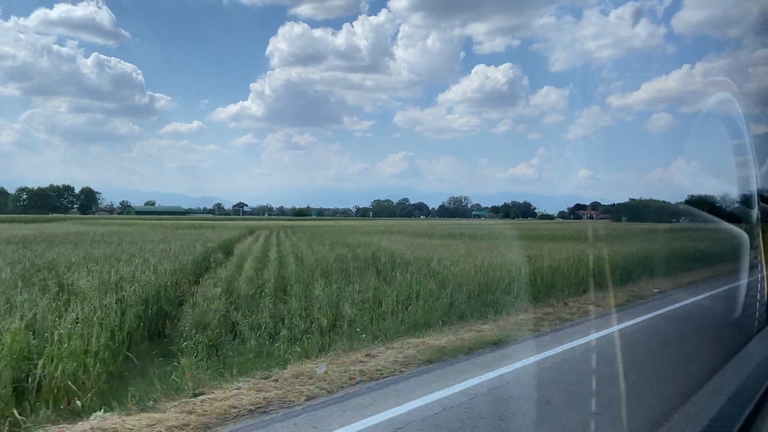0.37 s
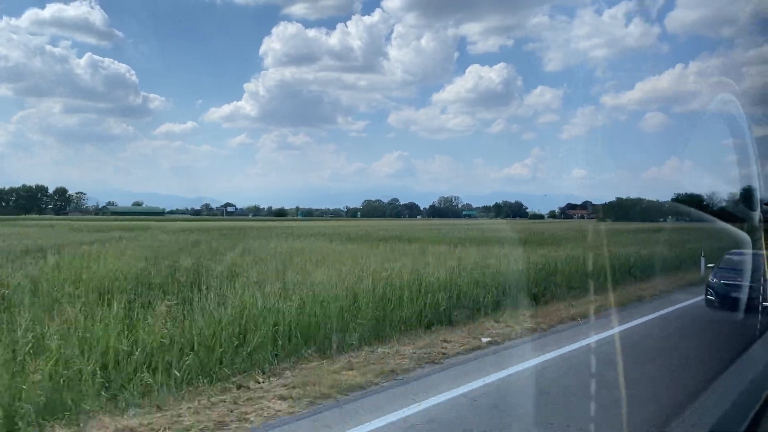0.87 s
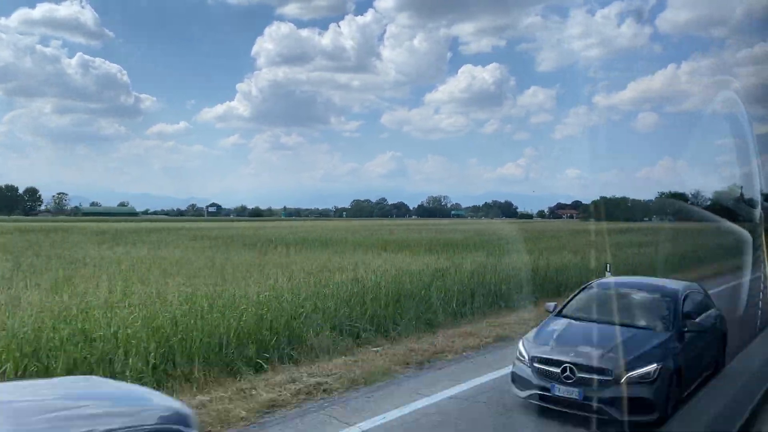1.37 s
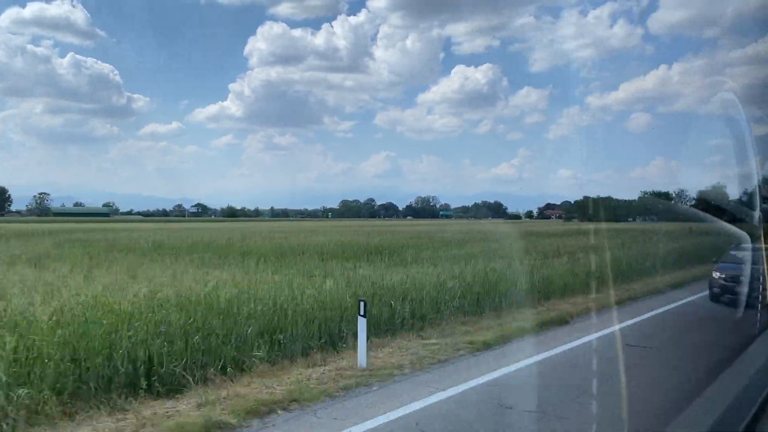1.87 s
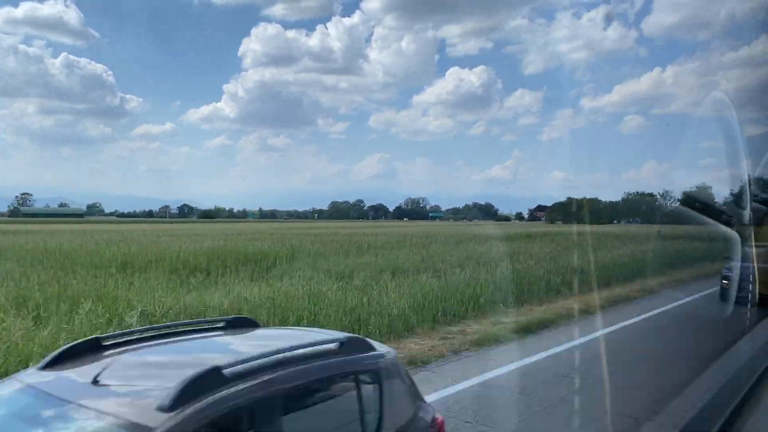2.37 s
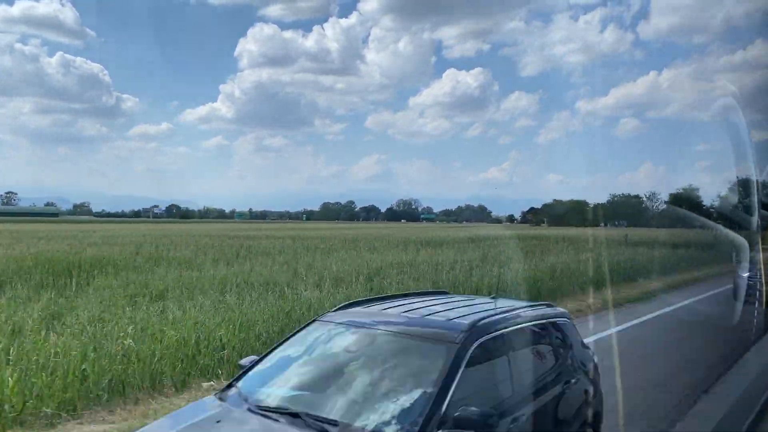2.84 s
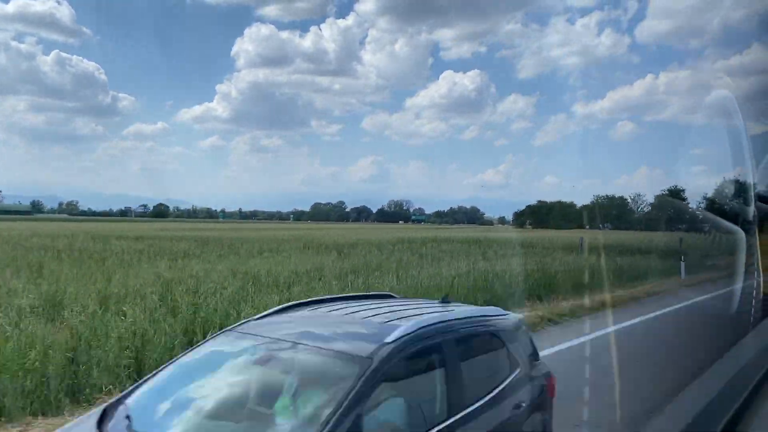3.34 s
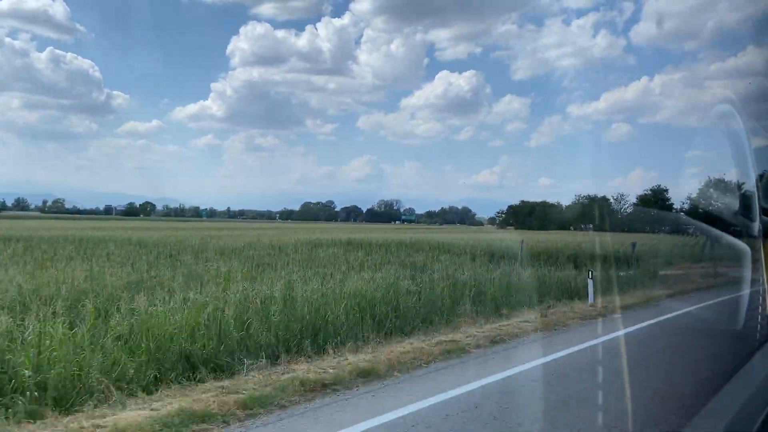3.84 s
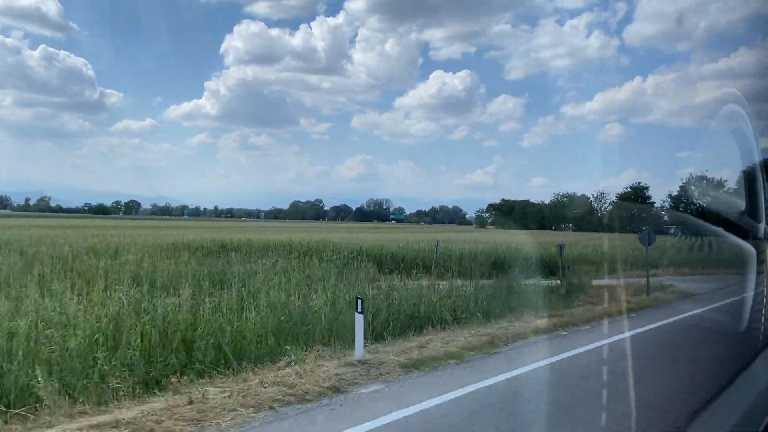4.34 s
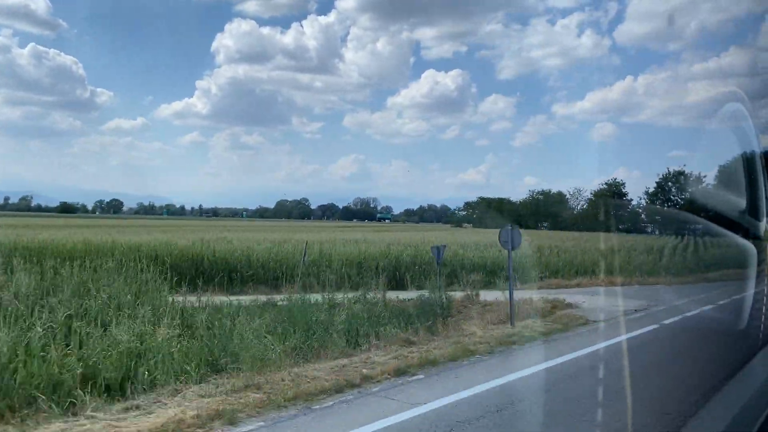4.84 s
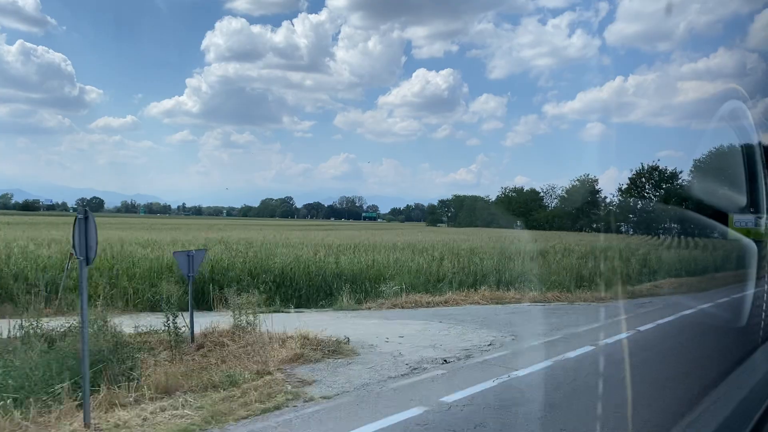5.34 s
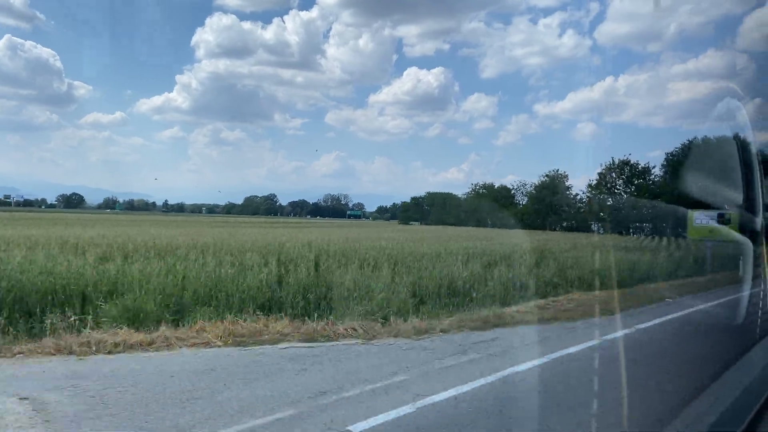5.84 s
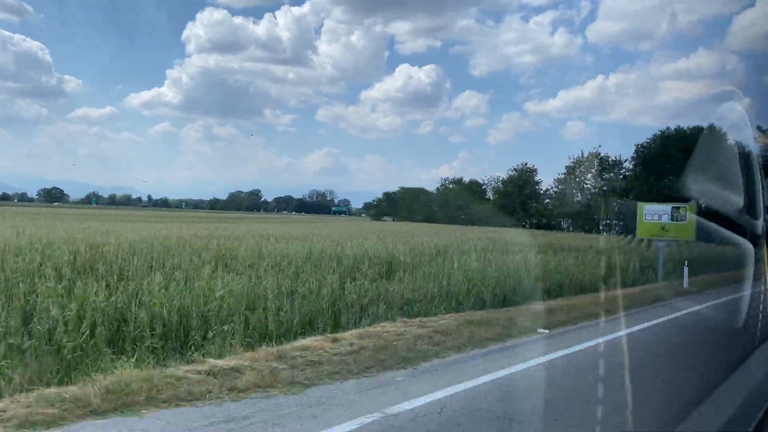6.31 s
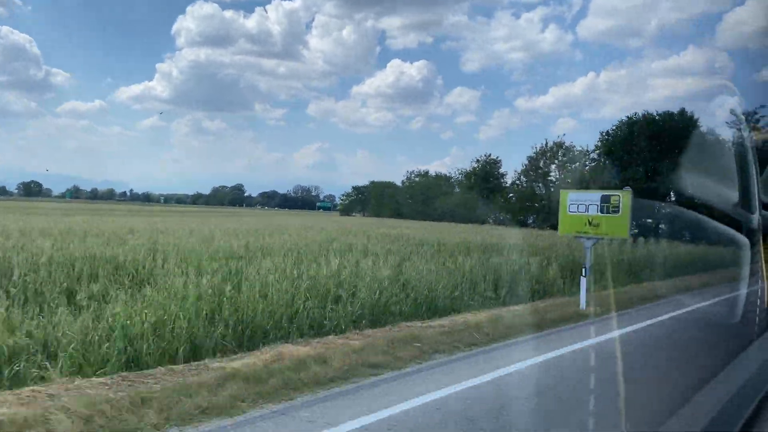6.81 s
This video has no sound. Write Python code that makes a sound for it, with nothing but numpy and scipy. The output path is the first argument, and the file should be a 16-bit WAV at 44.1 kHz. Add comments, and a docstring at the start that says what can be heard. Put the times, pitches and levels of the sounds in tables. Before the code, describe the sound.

Inside a moving coach, a deep steady drone of road boom and engine hum, with loose trim buzzing and rattling in quick bursts and sharp ticks.

```python
"""Inside a coach at steady road speed, a phone held at the window, in stereo.
Throughout: filtered noise for road boom, tyres and air, sine orders for an engine that sinks slowly.
From the start a faint narrow-band whine weakens to about 4 s, then partly returns, unevenly.
Loose trim rattles in swarms of contacts about 12 times a second: briefly at first, at 0.8-4 s in one
long run, from 4.5 s in shorter runs. Harder ticks, short noise rings, crowd at 1.9-2.9 s and after 5.6 s."""
import sys
import numpy as np
from scipy import signal
from scipy.fft import rfft, irfft, next_fast_len
from scipy.io import wavfile
from scipy.ndimage import uniform_filter1d, minimum_filter1d, map_coordinates

SR = 44100
rng = np.random.default_rng(int(sys.argv[2]) if len(sys.argv) > 2 else 0)


def store_pcm(level_fs):
    """Save levels as 16-bit WAV."""
    pcm = np.round(np.clip(level_fs, -1, 1) * 32767).astype(np.int16)
    wavfile.write(sys.argv[1], SR, np.atleast_2d(pcm).T)


def convert_level_to_amplitude(level_db):
    """Map a level in decibels to its linear amplitude factor."""
    exponent = np.asarray(level_db, float) / 20
    return 10 ** exponent


N = 317079


def unit(x):
    """Scale to rms 1."""
    return x / np.sqrt(np.mean(x ** 2) + 1e-20)


def along(points, freq_hz):
    """Read (freq_hz, value) points on a log frequency axis."""
    point_hz, value = np.transpose(points)
    return np.interp(np.log(freq_hz + 1), np.log(point_hz + 1), value)


def curves(rows):
    """One value per sample for each column after the time."""
    time_s, *columns = np.transpose(rows)
    return [np.interp(np.arange(N) / SR, time_s, column) for column in columns]


def wobble(knots_per_s):
    """Smooth random curve: a spline through random knots."""
    knots = rng.standard_normal(int(N * knots_per_s / SR) + 4)
    return map_coordinates(knots, [np.arange(N) * knots_per_s / SR])


def filtered(x, response):
    """Multiply the spectrum of x by a complex response of frequency."""
    size = next_fast_len(N + SR // 2)
    spectrum = rfft(x, size) * response(np.fft.rfftfreq(size, 1 / SR))
    return irfft(spectrum, size)[..., :N]


def resonances(modes):
    """Causal response of (centre_hz, width_hz, level_db) modes in parallel, signs alternating."""
    def response(hz):
        total = 0
        for k, (centre_hz, width_hz, level_db) in enumerate(modes):
            damping = 1j * hz * width_hz
            total = total + (-1) ** k * convert_level_to_amplitude(level_db) * damping / (centre_hz ** 2 - hz ** 2 + damping)
        return total
    return response


def noise(spectrum, patchy_db):
    """Two unrelated noises of rms 1, sharing time-frequency patches of random gain."""
    z = signal.stft(rng.standard_normal((2, N)), nperseg=512)[2]
    field = uniform_filter1d(rng.standard_normal(z.shape[1:]), size=5, axis=0)
    field = uniform_filter1d(field, size=12, axis=1)
    pair = signal.istft(z * convert_level_to_amplitude(patchy_db * unit(field)), nperseg=512)[1][:, :N]
    return unit(filtered(pair, lambda hz: convert_level_to_amplitude(along(spectrum, hz))))


def tone(freq_hz, level_db, wander_hz, waver_db):
    """Sine with wandering pitch and level, at unrelated phases on two paths."""
    phase = 2 * np.pi * np.cumsum(freq_hz + wander_hz * wobble(6)) / SR
    level = np.sqrt(2) * convert_level_to_amplitude(level_db + waver_db * wobble(4.6))
    return level * np.sin(phase + 2 * np.pi * rng.random((2, 1)))


# body boom under and over 65 Hz: time_s, shake_db, boom_db
ROAD_LEVELS = [(0, -11.5, -17), (.66, -27.5, -14.5), (1.04, -19.5, -20), (2.16, -20.5, -15),
               (2.64, -19.5, -17), (3.2, -20, -18), (3.5, -18.5, -20), (3.68, -22.5, -23.5),
               (4.25, -19, -17), (4.95, -17.5, -16.5), (5.23, -20, -18.5), (5.49, -23, -15),
               (5.85, -16.5, -17), (6.0, -19, -20.5), (6.7, -20.5, -16), (6.83, -19, -24.5),
               (7.19, -20, -15.5)]
# relative noise spectra, lowest to highest: freq_hz, density_db
SHAKE_SPECTRUM = [(8, -52), (15, -42.5), (25, -21), (33, -7), (42, -3.5), (50, -2), (58, -3), (65, -3),
                  (84, -23), (140, -120)]
BOOM_SPECTRUM = [(38, -24.5), (65, -2), (75, -1), (95, 2), (102, -2.5), (112, -7.5), (130, -7), (150, -17),
                 (200, -61.5), (330, -120)]
DRUM_SPECTRUM = [(88, -36.5), (150, -5), (201, -1), (350, -17), (460, -35.5), (770, -120)]
# body resonances, applied twice: centre_hz, width_hz, level_db
BODY_MODES = [(70.87, 8.3, 0), (92.05, 8.9, -3)]
# lowest cabin hum: freq_hz, level_db (re shake), wander_hz
CABIN_HUM = (50.5, -3, 1.88)


def road():
    """Road unevenness drives low body modes and floor panels; the cabin hum follows the shaking."""
    shake_db, boom_db = curves(ROAD_LEVELS)
    drum_start_db, drum_fall_db_per_s, drum_swell_db, drum_db_per_boom_db = -27.5, 0.11, 0.82, 0.3
    drum_db = drum_start_db - drum_fall_db_per_s * np.arange(N) / SR
    drum_db = drum_db + drum_swell_db * wobble(9.0)
    drum_db = drum_db + drum_db_per_boom_db * (boom_db - boom_db.mean())
    # squared response: steep skirts
    body = filtered(rng.standard_normal((2, N)), lambda hz: resonances(BODY_MODES)(hz) ** 2)
    hum_hz, hum_db, wander_hz = CABIN_HUM
    shake = convert_level_to_amplitude(shake_db) * noise(SHAKE_SPECTRUM, patchy_db=1.7)
    boom = convert_level_to_amplitude(-1.5) * noise(BOOM_SPECTRUM, patchy_db=-0.2) + convert_level_to_amplitude(-6) * unit(body)
    drum = convert_level_to_amplitude(drum_db) * noise(DRUM_SPECTRUM, patchy_db=-0.03)
    hum = tone(hum_hz, shake_db + hum_db, wander_hz, waver_db=-1.0)
    return shake + convert_level_to_amplitude(boom_db) * boom + drum + hum


# tyre roar: time_s, roar_db
ROAR_LEVELS = [(0, -32), (.5, -32.5), (.75, -33.5), (.94, -36), (1.5, -35), (2.2, -34), (2.6, -35),
               (3.14, -36), (3.72, -36.5), (4.4, -36), (5.1, -36), (5.5, -35), (5.79, -34), (6.2, -34),
               (6.7, -33.5), (6.95, -34), (7.19, -35)]
# relative noise spectra of tyre roar, tread, air: freq_hz, density_db
ROAR_SPECTRUM = [(210, -36), (350, -1), (378, -6.5), (410, -3.5), (556, -3), (605, -5), (800, -10.5),
                 (1040, -28), (1760, -120)]
TREAD_SPECTRUM = [(470, -38.5), (800, -2.5), (1100, -4.5), (1230, -7.5), (1350, -10.5), (1430, -11),
                  (1540, -13.5), (2000, -17.5), (2600, -46), (4400, -120)]
HISS_SPECTRUM = [(1180, -22), (2000, -5), (2900, -8.5), (4850, -14), (7000, -21), (8500, -23.5),
                 (10000, -26.5), (12000, -29), (16000, -32.5), (22000, -120)]


def rush():
    """Tyre roar, tread noise and air hiss: noise bands that rise and fall together."""
    roar_db, = curves(ROAR_LEVELS)
    swell_db = roar_db - roar_db.mean()
    tread_db = -43 + 0.94 * swell_db
    hiss_db = -53.5 + 0.7 * swell_db + 0.28 * wobble(9)
    roar = convert_level_to_amplitude(roar_db + 0.74 * wobble(2.96)) * noise(ROAR_SPECTRUM, patchy_db=1.5)
    tread = convert_level_to_amplitude(tread_db) * noise(TREAD_SPECTRUM, patchy_db=1.38)
    hiss = convert_level_to_amplitude(hiss_db) * noise(HISS_SPECTRUM, patchy_db=1.26)
    return roar + tread + hiss


# crank speed: time_s, turns_per_s
CRANK_SPEED = [(0, 30.95), (1.5, 30.56), (4.5, 29.17), (7.19, 28.45)]
# engine tones: order (multiple of crank speed), start_db_rms, end_db_rms
ENGINE_ORDERS = [(3, -26, -35), (4, -32, -31), (6, -40, -39), (7, -46, -44), (8, -52, -40), (9, -49, -53),
                 (10, -40, -44), (11, -51, -50), (12, -56, -53), (13, -50, -46), (15, -47, -55),
                 (17, -61, -54), (19, -54, -52), (22, -58, -58), (24, -59, -65), (28, -66, -60),
                 (32, -57, -66), (33, -60, -58), (47, -63, -70)]


def engine():
    """Sines at multiples of the crank speed sink with it."""
    crank_hz, = curves(CRANK_SPEED)
    progress = np.arange(N) / N
    total = 0
    for order, start_db, end_db in ENGINE_ORDERS:
        level_db = start_db + progress * (end_db - start_db)
        total = total + tone(order * crank_hz, level_db, wander_hz=0.06 * order, waver_db=3.5)
    return total


# whine bands, applied twice: centre_hz, width_hz, level_db
WHINE_MODES = [(1203, 50, 0.5), (1452, 36, 1.5), (2105, 240, -9), (2420, 52, -6)]
# whine level: time_s, level_db_rms
WHINE_LEVELS = [(0, -48), (1.6, -51.5), (2.4, -52.5), (3.2, -57), (4.2, -61.5), (4.6, -55.5), (5.2, -56),
                (5.7, -52.5), (6.2, -58), (7.19, -54.5)]


def whine():
    """Noise in fixed narrow bands whines faintly."""
    level_db, = curves(WHINE_LEVELS)
    # squared response: steep skirts
    bands = filtered(rng.standard_normal((2, N)), lambda hz: resonances(WHINE_MODES)(hz) ** 2)
    return convert_level_to_amplitude(level_db) * unit(bands)


# hard ticks: start_s, knock_peak_db, centre_hz, snap_peak_db
TICK_EVENTS = [(0.133, -45.5, 3000, -47.5), (0.929, -47, 2970, -39.5), (1.425, -50, 3000, -42.5),
               (1.858, -29, 2300, -39), (1.94, -33, 2200, -42.5), (1.949, -37.5, 2480, -43),
               (2.188, -42, 3020, -42.5), (2.246, -36, 2480, -43), (2.261, -37, 3020, -33),
               (2.614, -37, 2500, -38), (2.688, -32, 2200, -43), (2.788, -39, 2480, -38),
               (2.900, -32.5, 2510, -43), (3.764, -34.5, 2100, -52), (4.973, -35, 1340, -60),
               (5.582, -36, 2520, -35), (5.597, -45, 2000, -46.5), (5.666, -31.5, 2260, -39.5),
               (5.673, -32.5, 2020, -41.5), (5.748, -34, 2500, -38), (5.992, -30.5, 1250, -55.5),
               (6.382, -42, 3000, -42), (6.888, -38.5, 3000, -33.5), (6.937, -42, 3000, -35.5),
               (7.025, -34, 2280, -50.5), (7.047, -43, 3000, -42)]


def ticks():
    """A decaying noise puff rings round a centre pitch, under a bright snap that bounces once."""
    t = np.arange(SR // 20) / SR
    knock_t60_s, snap_t60_s = 0.033, 0.01
    bounce_s, bounce_db = 0.0034, -8
    out = np.zeros((2, N + len(t)))
    for start_s, knock_db, centre_hz, snap_db in TICK_EVENTS:
        knock_puff, snap_puff = rng.standard_normal((2, 2, len(t)))
        band = signal.iirpeak(centre_hz, 1.0, SR)
        knock = signal.lfilter(*band, knock_puff * convert_level_to_amplitude(-60 * t / knock_t60_s))
        knock = signal.lfilter(*band, knock)  # second pass: steep skirts
        snap = signal.lfilter(*signal.iirpeak(10200, 1.6, SR), snap_puff * convert_level_to_amplitude(-60 * t / snap_t60_s))
        snap = snap + convert_level_to_amplitude(bounce_db) * np.roll(snap, round(bounce_s * SR), axis=1)
        place = out[:, round(start_s * SR):][:, :len(t)]
        place += convert_level_to_amplitude(knock_db) * knock / np.abs(knock).max(axis=1, keepdims=True)
        place += convert_level_to_amplitude(snap_db) * snap / np.abs(snap).max(axis=1, keepdims=True)
    return out[:, :N]


# trim shakes, for crackle() and rattle(): peak_s, body_drive_db, top_drive_db
SHAKE_EVENTS = [(0.088, -42, -60), (0.18, -40.5, -55), (0.259, -42.5, -53.5), (0.536, -50.5, -64),
                (0.782, -46.0, -59.5), (0.858, -42, -54), (0.931, -43.5, -51.5), (1.026, -41.0, -52),
                (1.113, -41.5, -53.5), (1.194, -39.5, -51), (1.276, -43.5, -50.5), (1.36, -44, -54.5),
                (1.424, -50, -62.5), (1.508, -51.5, -61), (1.582, -45, -58.5), (1.661, -44, -55),
                (1.74, -43, -51.5), (1.824, -41, -51), (1.909, -38.5, -51), (2.003, -41, -53.5),
                (2.116, -42, -52.5), (2.207, -39.5, -48.5), (2.291, -38, -50.5), (2.381, -40.5, -52.5),
                (2.454, -40.5, -53.5), (2.522, -40.5, -50), (2.599, -40.5, -53.5), (2.68, -41.5, -51.5),
                (2.759, -39.5, -51), (2.845, -40, -51), (2.924, -40, -53.5), (3.003, -37, -51),
                (3.085, -37.0, -50), (3.169, -38, -51.5), (3.247, -40.5, -53), (3.323, -41.0, -52),
                (3.401, -40.5, -53), (3.475, -37.5, -50.5), (3.558, -41, -53), (3.647, -43.5, -54.5),
                (3.727, -48.5, -61.0), (3.803, -47, -56.5), (3.891, -47.5, -57), (3.977, -51.0, -66.5),
                (4.475, -52.5, -63.0), (4.593, -46.0, -57), (4.669, -44, -57.5), (4.746, -41, -54),
                (4.825, -43.0, -51.5), (4.913, -42.0, -54), (4.989, -43, -52), (5.07, -43, -53),
                (5.154, -42, -57.0), (5.245, -43.5, -54.5), (5.484, -49.5, -63.5), (5.554, -46.5, -59),
                (5.641, -39.5, -51), (5.723, -37.5, -52.5), (5.808, -37.5, -52), (5.898, -44, -53.5),
                (6.056, -56.5, -66.5), (6.136, -47.5, -59.5), (6.211, -49, -61.5), (6.383, -50.5, -56),
                (6.423, -46.5, -57.5), (6.49, -37.5, -50), (6.575, -40, -50.5), (6.65, -40, -49.5),
                (6.732, -40.5, -50.5), (6.817, -40, -51.5), (6.899, -41.0, -51.5), (6.938, -42, -55),
                (6.983, -39.0, -52), (7.027, -51, -57), (7.078, -43, -55.5)]
# trim resonances, body and bright top: centre_hz, width_hz, level_db
TRIM_MODES = [(2200, 550, -0.5), (3285, 316, 6), (4430, 980, -0.5), (6200, 860, -1.5), (7960, 1100, -9)]
TRIM_TOP_MODES = [(9600, 4300, 3.5), (11920, 3200, 2), (14800, 1700, -13)]


def crackle():
    """Stray single contacts, sized after the shakes around them, ring the trim."""
    peak_s, body_db, _ = np.transpose(SHAKE_EVENTS)
    contacts_per_s, offset_db, spread_db = 240, -10, 5
    hits = rng.random(N) < contacts_per_s / SR
    size_db = np.interp(np.arange(N) / SR, peak_s, body_db) + offset_db
    size_db = size_db + spread_db * rng.standard_normal(N)
    contacts = hits * convert_level_to_amplitude(size_db) * rng.standard_normal((2, N))
    return filtered(contacts, resonances(TRIM_MODES + TRIM_TOP_MODES[:1]))


def rattle():
    """Each shake is a quick swarm of tiny contacts that builds, thins out and rings the trim."""
    t = np.arange(SR // 12) / SR
    body, top = np.zeros((2, 2, N + len(t)))
    rise_s, fast_t60_s, slow_t60_s = 0.0095, 0.084, 0.41
    decay = convert_level_to_amplitude(-60 * np.maximum(t - rise_s, 0) / fast_t60_s) + convert_level_to_amplitude(-16.0 - 60 * t / slow_t60_s)
    swell = np.minimum(t / rise_s, 1) ** 0.61 * decay
    for peak_s, body_db, top_db in SHAKE_EVENTS:
        blows_db = 5 * uniform_filter1d(rng.standard_normal(len(t)), size=3)
        clumps_db = 1.7 * np.repeat(rng.standard_normal(len(t)), 60)[:len(t)]
        contacts = convert_level_to_amplitude(blows_db + clumps_db) * rng.standard_normal((2, len(t)))
        burst = swell * unit(contacts)
        start = round((peak_s - rise_s) * SR)
        body[:, start:][:, :len(t)] += convert_level_to_amplitude(body_db) * burst
        top[:, start:][:, :len(t)] += convert_level_to_amplitude(top_db) * burst
    return filtered(body[:, :N], resonances(TRIM_MODES)) + filtered(top[:, :N], resonances(TRIM_TOP_MODES))


# microphone ports, likeness: freq_hz, common_share
PORT_ALIKE = [(30, .998), (80, .975), (215, .92), (300, .5), (560, .68), (750, .35), (1080, .48),
              (1350, .15), (3000, .4), (7700, .35), (8200, .84), (10800, .96), (12500, .78)]
# left port's lead: freq_hz, lead_rad
PORT_LEAD = [(250, 0), (390, -1.6), (650, -2.4), (1100, -3), (1500, -5.8), (3000, -5.5), (5600, -6.3),
             (7400, -6.9), (8200, -9.8), (10800, -12.6), (12500, -14.6)]
# left minus right level: freq_hz, tilt_db
PORT_TILT = [(60, -.2), (190, 0), (350, 2), (630, 2.5), (1140, .5), (2050, 1.5), (3690, 2.5), (6650, 3),
             (8500, 0), (12000, .5)]


def ports(pair):
    """Mix two unrelated versions of a sound into left and right: part common, lagged and tilted."""
    def response(hz):
        turn = np.arccos(np.clip(along(PORT_ALIKE, hz), 0, 1)) / 2
        side = convert_level_to_amplitude(along(PORT_TILT, hz) / 2) * np.exp(0.5j * along(PORT_LEAD, hz))
        left = [np.cos(turn) * side, np.sin(turn) * side]
        right = [np.cos(turn) / side, -np.sin(turn) / side]
        return np.array([left, right])
    return filtered(pair, response).sum(axis=1)


def scene():
    """All sources reach the two microphone ports."""
    return ports(road() + rush() + engine() + whine() + ticks() + crackle() + rattle())


def band_limit(x):
    """A steep low-pass at the top of the band."""
    return signal.sosfilt(signal.butter(12, 15800, fs=SR, output="sos"), x)


def record(dry):
    """A limiter eases the gain down around the largest peaks."""
    needed = np.minimum(1, convert_level_to_amplitude(-3.6) / (np.abs(dry).max(axis=0) + 1e-9))
    gain = uniform_filter1d(minimum_filter1d(needed, size=1800), size=1700)
    return band_limit(gain * dry)


dry = scene()
out = record(dry)
store_pcm(out)
```